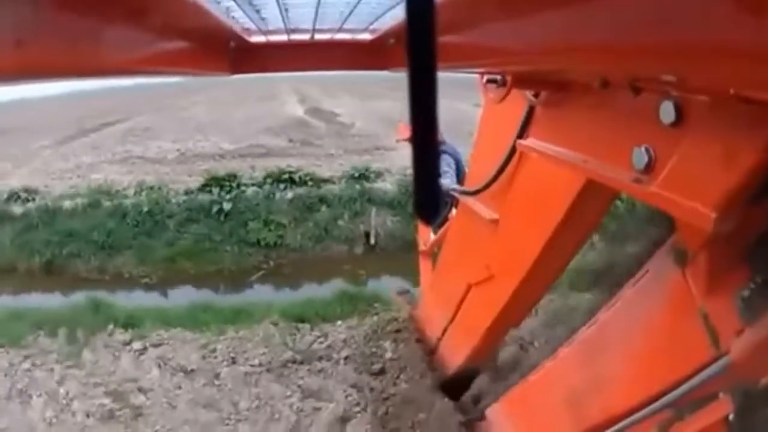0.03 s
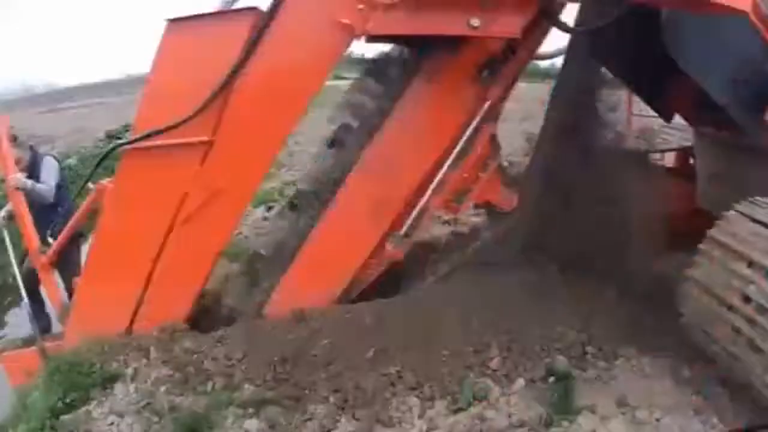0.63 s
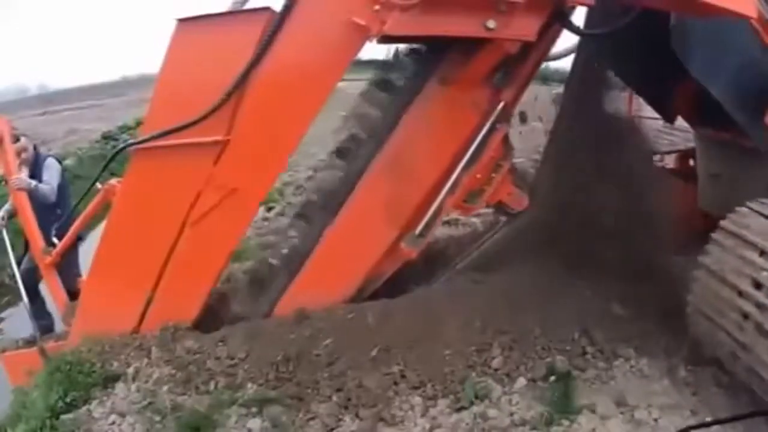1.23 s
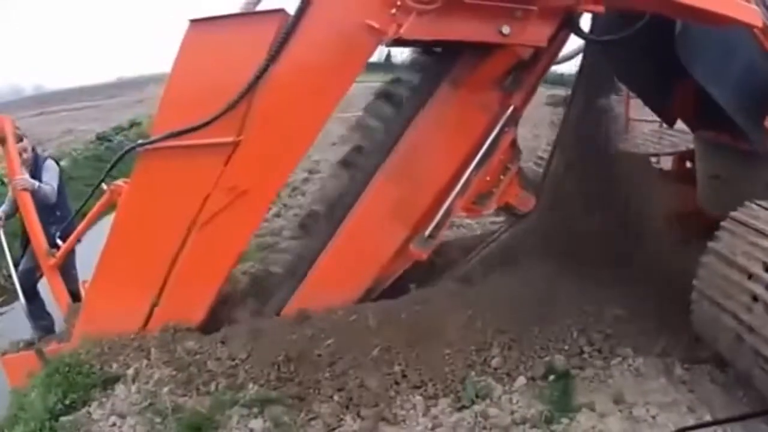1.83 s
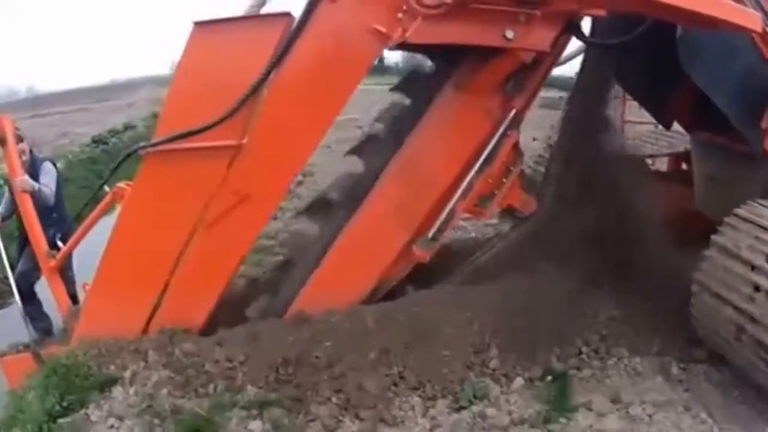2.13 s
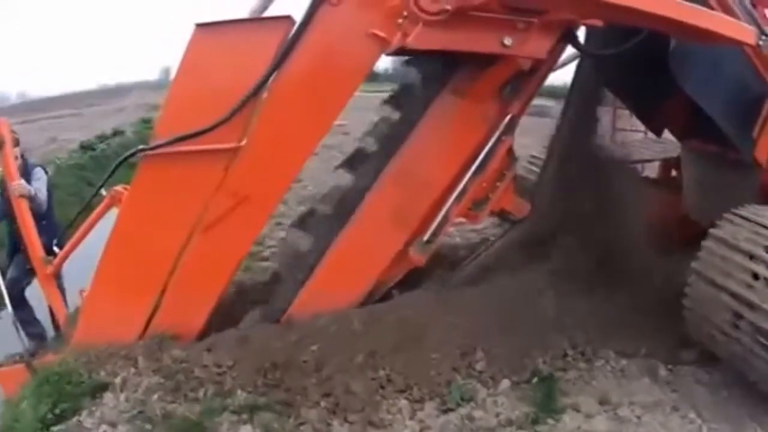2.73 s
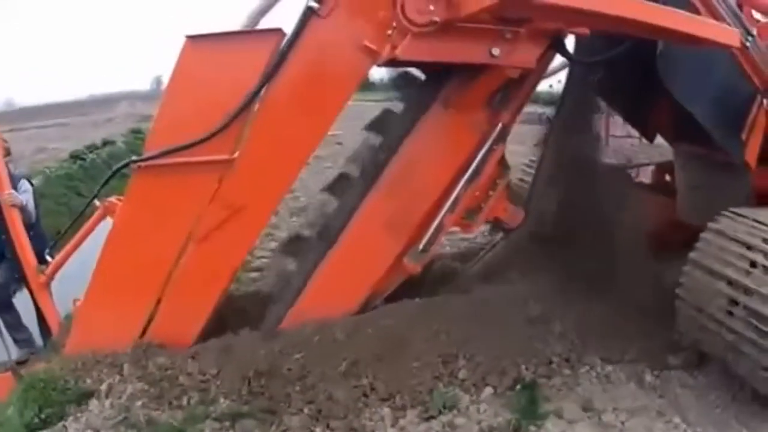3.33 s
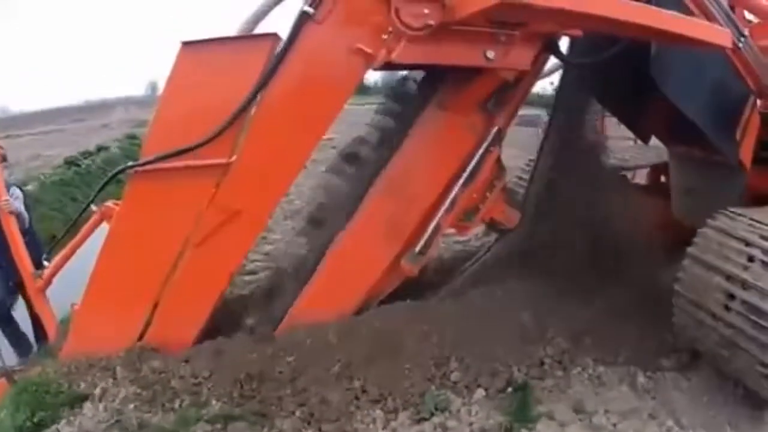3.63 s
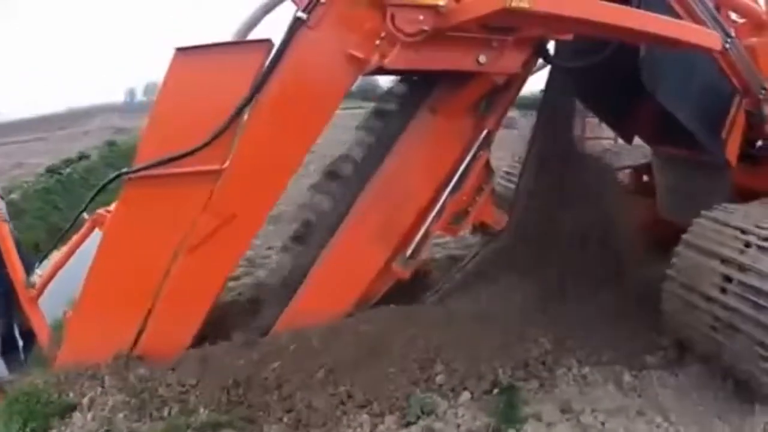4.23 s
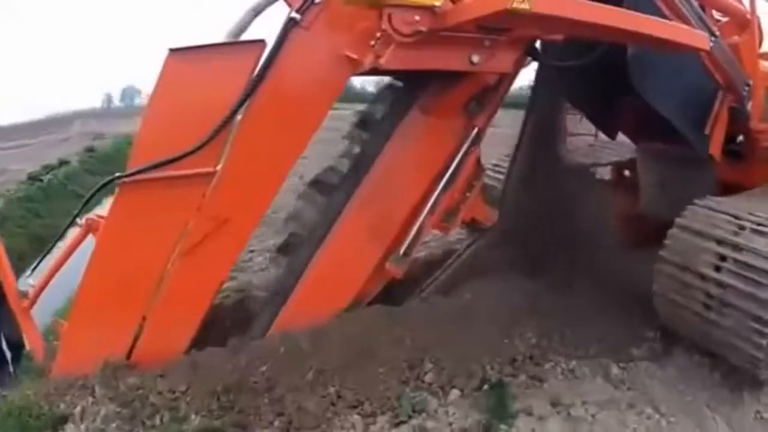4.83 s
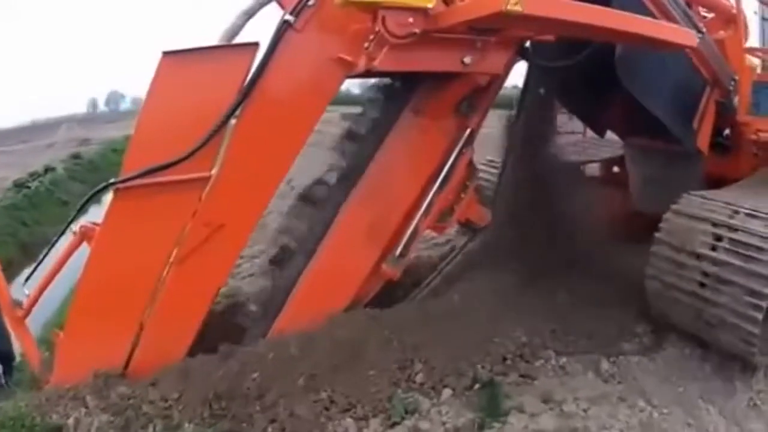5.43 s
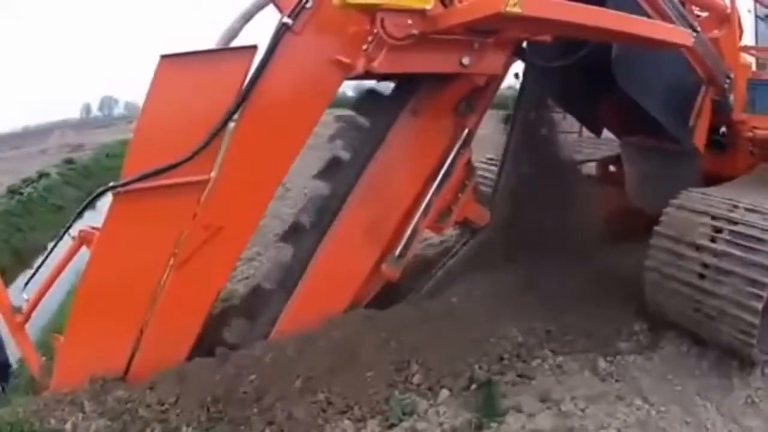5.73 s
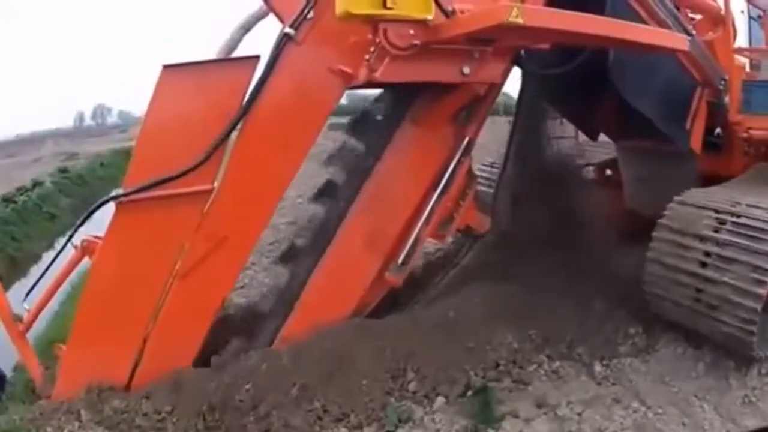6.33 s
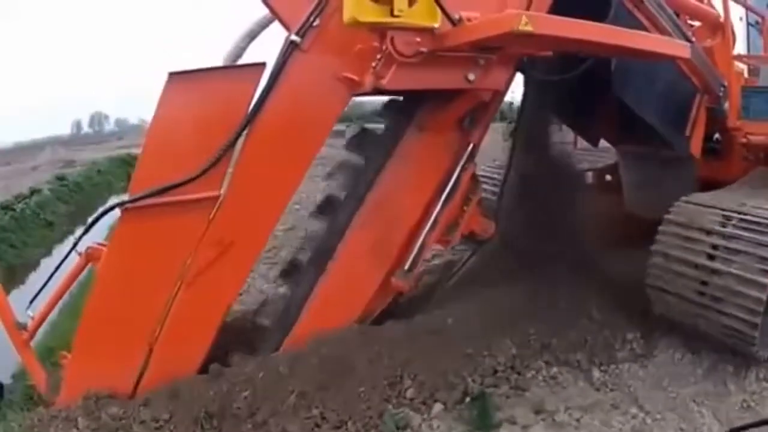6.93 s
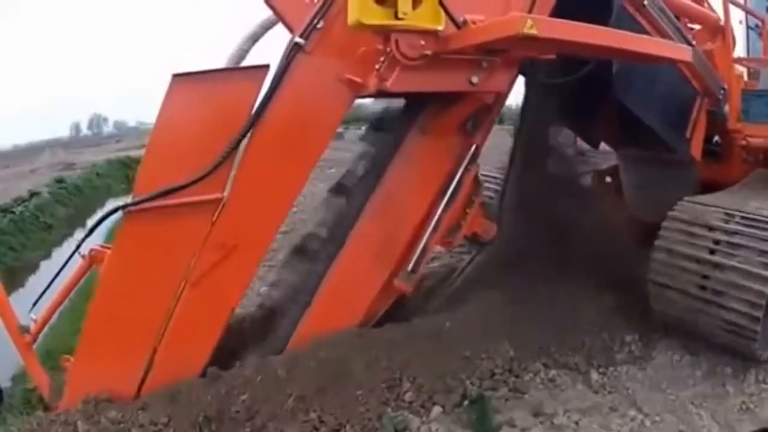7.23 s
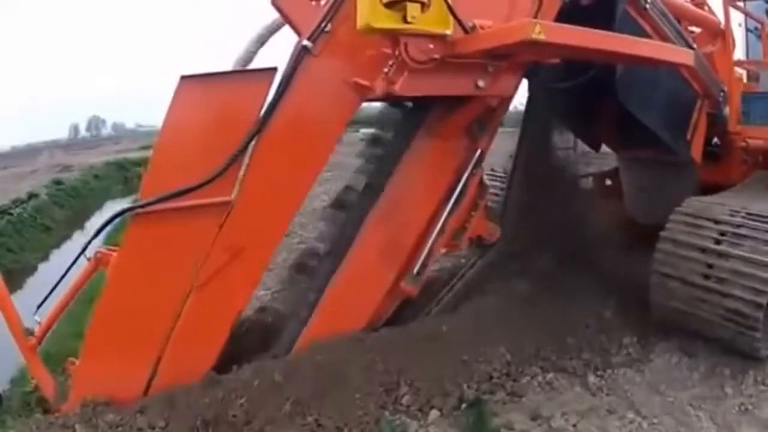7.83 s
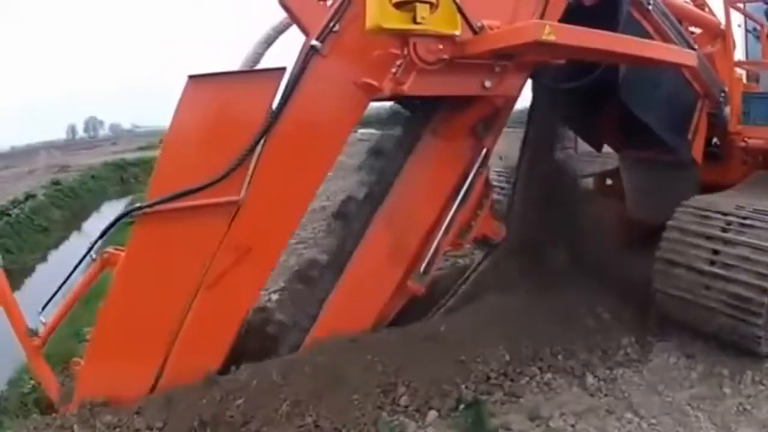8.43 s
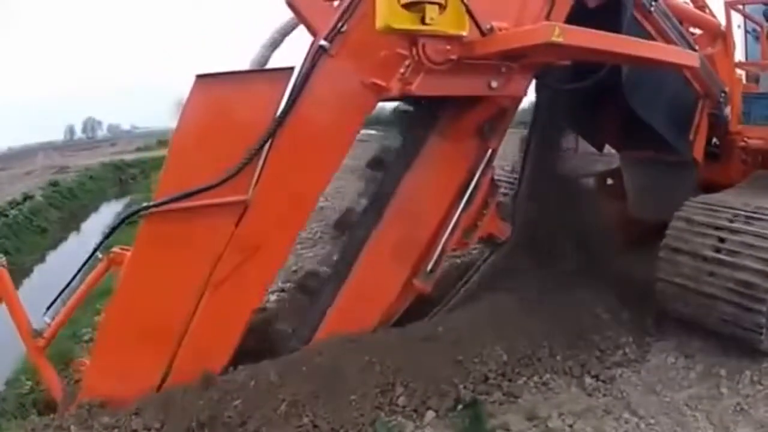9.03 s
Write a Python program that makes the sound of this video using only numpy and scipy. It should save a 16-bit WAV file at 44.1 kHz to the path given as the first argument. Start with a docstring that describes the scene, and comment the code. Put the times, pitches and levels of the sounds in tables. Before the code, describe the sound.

Loud steel rattling cuts to a quieter, fast rhythmic crunch of a chain trencher biting soil and stones over faint diesel hum.

```python
"""A tracked chain trencher cuts a trench in a field. We ride on it first: the steel frame booms,
rattles and squeals, and overloads the microphone. Then we stand on the ground beside the boom:
about 21 cutter teeth a second bite the soil, and the chain slaps the boom after each bite.
A brief squeak sounds and stones scrape and crack on the teeth, over diesel hum and a light breeze."""
import sys
import numpy as np
from scipy import signal
from scipy.fft import rfft, irfft, next_fast_len
from scipy.io import wavfile
from scipy.ndimage import uniform_filter1d, map_coordinates

SR = 44100
rng = np.random.default_rng(int(sys.argv[2]) if len(sys.argv) > 2 else 0)


def wav_record(signal):
    """Record a signal, one row per channel, as 16-bit PCM in the file named by sys.argv[1]."""
    frames = np.transpose(np.atleast_2d(signal))
    bounded = np.clip(frames, -1, 1)
    # unit amplitude maps onto the largest positive 16-bit level
    quanta = np.round(bounded * 32767).astype(np.int16)
    wavfile.write(sys.argv[1], SR, quanta)


N = 404397
TIME = np.arange(N) / SR

# Tone of crunching grit and pebbles. Each row: frequency in Hz, relative level in dB.
CRUNCH_SPECTRUM = [(500, -17.5), (1350, -14), (1750, -3.5), (2130, 1.5), (2750, -1.5), (3400, -10.5),
                   (4100, -16), (4900, -15.5), (7300, -17), (8100, -21), (9700, -11.5), (10900, -31),
                   (12800, -29.5), (14300, -18.5)]
# Resonances of the boom and its guards. Each row: pitch in Hz, width in Hz, relative level in dB.
BOOM_RESONANCES = [(153, 16.4, -7), (182.6, 15.4, 1), (220.6, 29.4, 2), (231.4, 12.6, 1), (253.4, 18, -3),
                   (321, 21, -6), (350.7, 34, -6.5), (396, 13, -3.5), (414.8, 11.6, -5)]


def from_db(db):
    """Decibels to gain."""
    return 10 ** (np.asarray(db) / 20)


def rms_one(x):
    """Scale to rms 1."""
    return x / np.sqrt(np.mean(x ** 2) + 1e-20)


def drift(rate_hz):
    """A smooth random wander of rms 1."""
    knots = rng.standard_normal(1000)
    coarse_s = TIME[::100]
    wander = map_coordinates(knots, [coarse_s * rate_hz * 2], order=3)
    return rms_one(np.interp(TIME, coarse_s, wander))


def coloured(x, spectrum):
    """Minimum-phase EQ through (Hz, dB) points, so nothing rings ahead of a click."""
    size = 2 * next_fast_len(N // 2 + 4096)
    hz = np.arange(size // 2 + 1) * SR / size
    points_hz, points_db = np.transpose(spectrum)
    gain = from_db(np.interp(np.log(hz + 1), np.log(points_hz), points_db))
    cepstrum = irfft(np.log(gain))
    cepstrum[1:size // 2] *= 2
    cepstrum[size // 2 + 1:] = 0
    return irfft(rfft(x, size) * np.exp(rfft(cepstrum)), size)[..., :N]


def resonate(x, modes):
    """Parallel resonances of alternating sign, each given as (Hz, width in Hz, dB)."""
    out = 0
    for k, (hz, width, level_db) in enumerate(modes):
        radius = np.exp(-np.pi * width / SR)
        poles = [1, -2 * radius * np.cos(2 * np.pi * hz / SR), radius ** 2]
        gain = (-1) ** k * from_db(level_db) * (1 - radius ** 2) / 2
        out = out + gain * signal.lfilter([1, 0, -1], poles, x + 1e-18)
    return out


def band(x, low_hz, high_hz):
    """Band-pass with steep edges."""
    return signal.sosfilt(signal.butter(4, [low_hz, high_hz], "band", fs=SR, output="sos"), x)


def tone(turns, order=1):
    """A sine of rms 1 that makes `order` cycles a turn."""
    return np.sqrt(2) * np.sin(2 * np.pi * order * turns)


def grains(per_s, spread_db=0):
    """Two unrelated streams of random clicks, varied in size by spread_db; rms 1."""
    sizes = from_db(spread_db * np.minimum(rng.exponential(1, (2, N)), 4))
    hits = rng.random((2, N)) < per_s / SR
    return rms_one(hits * sizes * rng.choice([-1, 1], (2, N)))


def stereo(pair, wider_db=0):
    """Two unrelated streams become mid and side of an image that is widest in the treble."""
    # Stereo width. Each row: frequency in Hz, side relative to mid in dB.
    width = [(200, -18), (1000, -21.5), (2200, -24), (4500, -13), (9000, -16)]
    side = from_db(wider_db) * coloured(pair[1], width)
    return np.array([pair[0] + side, pair[0] - side])


def chain_travel(teeth_per_s=20.87, speed_up_per_s2=0.04, first_bite_s=0.023):
    """Running count of teeth at every sample, as the chain slowly gathers speed."""
    return (teeth_per_s + speed_up_per_s2 * TIME / 2) * (TIME - first_bite_s) + 1


def bites(lag, uneven_db, floor, rise=0.11, fall=0.21):
    """Chain force: each tooth loads up and lets go with its own strength; times in tooth spacings."""
    travel = chain_travel() - lag
    tooth = np.round(travel).astype(int)
    since = travel - tooth
    strength = from_db(uneven_db * np.clip(rng.standard_normal(256), -2, 1.5))[tooth]
    pulse = np.exp(np.where(since < 0, since / rise, -since / fall))
    return rms_one(floor + strength * pulse)


def frame(jolt_s=0.0087):
    """The chain's shaking comes straight through the frame: deep booming, rattle and a thin squeal."""
    # Resonances of the frame. Each row: pitch in Hz, width in Hz, relative level in dB.
    frame_modes = [(61.3, 6.9, 6.5), (98.6, 9.3, 4), (115.4, 8.9, 1.5), (226, 8.3, -13.5), (287, 18, -9.5),
                   (347, 26.2, -1), (441.3, 23.6, -3), (886, 39, -18), (950, 20, -24.5), (1847, 46, -28)]
    # Jolts that shake the frame harder. Each row: time in seconds, boost in dB.
    jolts = [(0.043, 6), (.173, 0.5), (.365, 3), (.48, 3), (.58, 6)]
    # Tone of the rattle. Each row: frequency in Hz, relative level in dB.
    rattle_spectrum = [(20, 1.5), (170, 0), (500, -1), (800, -5), (1100, -10), (2100, -16), (2800, -14),
                       (4000, -24.5), (5200, -28), (7000, -32.5), (8800, -26), (12500, -28.5),
                       (15000, -34.5)]
    # Squealing steel. Each row: pitch in Hz, width in Hz, relative level in dB.
    squeal_modes = [(11570, 40, -5), (11648, 25, 0), (12350, 35, -1), (12435, 30, -3)]
    shaking = grains(per_s=6000)
    booming = np.roll(resonate(shaking[0], frame_modes), -SR)   # already ringing at the start
    booming /= np.sqrt(uniform_filter1d(booming ** 2, SR // 10) + 1e-12)   # the drive keeps effort even
    jolt_db = sum(db * np.exp(-((TIME - s) / jolt_s) ** 2) for s, db in jolts)
    force = bites(lag=0.2, uneven_db=11.5, floor=2.46) * from_db(jolt_db)
    clatter = coloured(grains(per_s=16000, spread_db=1.5) * force, rattle_spectrum)
    rattle = stereo(rms_one(clatter), wider_db=4)
    squeal = rms_one(resonate(shaking[1] * force, squeal_modes))
    return from_db(-4.5) * booming + from_db(-18) * rattle + from_db(-38) * squeal


def soil(load_db, patchy_db=1.14, dig_share=0.86):
    """Grit, pebbles and clods break under each tooth; between bites the spoil keeps pouring."""
    # How hard the teeth dig. Each row: time in seconds, crunch level in dB.
    digging = [(0.74, -46), (1.07, -47), (2.73, -43), (2.85, -50), (2.96, -45), (3.96, -43), (4.11, -51),
               (4.25, -42), (5.09, -45), (5.67, -41.5), (6.26, -45.5), (6.42, -39.5), (6.59, -46.5),
               (6.99, -41), (7.13, -45.5), (7.43, -39.5), (7.71, -46), (8.01, -40.5), (8.12, -44.5),
               (8.7, -44.9), (9.03, -41.5), (9.14, -43.5)]
    # Tone of thudding clods. Each row: frequency in Hz, relative level in dB.
    clod_spectrum = [(40, -7), (130, 1), (480, -4), (640, 5.5), (800, -2.5), (1120, 0), (1320, -13),
                     (2000, -18), (4000, -25.5)]
    dig_db = np.interp(TIME, *np.transpose(digging)) + patchy_db * drift(4)   # the soil is patchy
    grit_force = bites(lag=0.0043, uneven_db=7.5, floor=1.62)
    grit_clicks = grains(per_s=9000, spread_db=1.5) * grit_force * from_db(0.53 * drift(16))
    grit = rms_one(coloured(grit_clicks, CRUNCH_SPECTRUM))
    clod_force = bites(lag=0.07, uneven_db=6, floor=0.7)
    clods = rms_one(coloured(grains(per_s=2500, spread_db=3) * clod_force, clod_spectrum))
    clods_db = -4.5 + dig_share * dig_db + (1 - dig_share) * load_db
    crunch = from_db(dig_db) * (from_db(0.5) * grit + from_db(-3.5) * pebbles())
    return stereo(crunch + from_db(clods_db) * clods)


def pebbles(per_bite=3, uneven_db=3.5, scatter_teeth=0.33, decay_s=0.007, q=15):
    """Pebbles are hit around each bite: sudden rasps that ring the chain at pitches of their own."""
    travel = chain_travel()
    teeth = np.repeat(np.arange(1, int(travel[-1]) + 1), per_bite)
    places = teeth + scatter_teeth * rng.standard_normal(len(teeth)) - 0.08
    hits = (np.interp(places, travel, TIME) * SR).astype(int).clip(0, N - 1)
    force = from_db(uneven_db * rng.uniform(-2, 2, len(hits)))
    rasp = grains(per_s=14000)
    ringing = 0
    for hz in np.geomspace(900, 11000, 20):
        strikes = np.bincount(hits, force * rng.random(len(hits)) ** 5, N)   # a few pitches lead each hit
        envelope = signal.lfilter([1], [1, -np.exp(-1 / (decay_s * SR))], strikes + 1e-18)
        ringing = ringing + resonate(rasp * envelope, [(hz, hz / q, 0)])
    return rms_one(coloured(ringing, CRUNCH_SPECTRUM))


def boom(load_db, rumble_db=1.5):
    """The chain slaps the boom just after each bite and sets its plates ringing."""
    force = bites(lag=0.096, uneven_db=4.5, floor=0.88)
    slaps = grains(per_s=2800, spread_db=3.5)[0] * force
    ringing = band(resonate(slaps, BOOM_RESONANCES), 115, 454)
    ringing /= np.sqrt(uniform_filter1d(ringing ** 2, SR // 8) + 1e-12)   # the drive keeps effort even
    return from_db(load_db + rumble_db) * ringing


def engine(crank_hz=22.17, beat_s=2.44, dip_at_s=2.56, hum_full_s=7.4, hum_rise_db_per_s=18):
    """A six-cylinder diesel fires three times a turn; its higher hum comes up as we near it."""
    turns = np.cumsum(crank_hz * (1 + 0.00078 * drift(1.27))) / SR
    slip = (TIME - dip_at_s) / beat_s / 3   # a weaker tone beats slowly against the firing tone
    firing = from_db(-54.5) * tone(turns, order=3) - from_db(-62) * tone(turns + slip, order=3)
    hum_db = -53 - hum_rise_db_per_s * np.maximum(hum_full_s - TIME, 0) + 2.6 * drift(2.6)
    return firing + from_db(hum_db) * tone(turns, order=7)


def wind(breeze_db=-64):
    """A light breeze rumbles on the microphone and swells in gusts."""
    # Gusts. Each row: time of the peak in seconds, level in dB, half-length in seconds.
    gusts = [(2.253, -52, 0.3), (4.505, -51, 0.24)]
    swells = sum(from_db(db) * np.exp(-((TIME - s) / length) ** 2) for s, db, length in gusts)
    return (from_db(breeze_db) + swells) * rms_one(band(rng.standard_normal(N), 29, 99))


def squeak(start_s=1.2665, attack_s=0.002, length_s=0.023, level_db=-34.5):
    """A brief, wavering squeak of several high tones."""
    # Partials of the squeak. Each row: pitch in Hz, pitch wobble in Hz, relative level in dB.
    partials = [(1120, 35, -3), (1690, 40, -3), (2120, 28, 2), (2580, 56, 0), (3260, 35, -2),
                (3700, 91, -7)]
    age = np.maximum(TIME - start_s, 0)
    envelope = (1 - np.exp(-age / attack_s)) * np.exp(-(age / length_s) ** 4)
    tones = sum(from_db(db) * tone(np.cumsum(hz + wobble * drift(37)) / SR)
                for hz, wobble, db in partials)
    return from_db(level_db) * envelope * rms_one(tones)


def scrapes(ring_db=-5, boom_db=14):
    """A stone catches and judders along the steel; the contact spot rings and the boom answers."""
    # Dragged stones. Each row: start in seconds, level in dB, length in seconds, ringing pitch in Hz.
    drags = [(1.315, -35.5, .014, 1880), (1.365, -37.5, .014, 2100), (1.408, -32, .006, 3400),
             (2.319, -32, .06, 1050), (2.415, -38, .026, 2060), (2.967, -37, .03, 2280),
             (3.460, -35, .011, 2820), (4.034, -35.5, .021, 2130), (4.177, -38, .028, 2730),
             (4.601, -35, .019, 2070), (4.914, -35, .026, 2350), (5.222, -34.5, .015, 2100),
             (5.743, -33.5, .011, 1820), (5.886, -33.5, .02, 1880), (6.169, -35, .019, 1170),
             (6.310, -34, .022, 2150), (6.405, -31, .012, 2130), (8.037, -32, .012, 2520),
             (8.858, -35, .023, 2140), (9.081, -34, .035, 2240), (9.143, -29.5, .009, 2050)]
    # Tone of stone on steel. Each row: frequency in Hz, relative level in dB.
    stone_spectrum = [(70, -59), (500, -11.5), (1050, 1), (1400, -10), (2150, 8), (3500, -18), (5000, -13),
                      (8000, -16.5), (9800, -10), (12000, -34), (14300, -13)]
    rasp, ringing = np.zeros((2, N)), np.zeros(N)
    judder = rms_one(coloured(grains(per_s=5600, spread_db=-1), stone_spectrum))
    for start_s, level_db, length_s, hz in drags:
        start = int(start_s * SR)
        age = TIME[:min(SR // 4, N - start)]
        span = slice(start, start + len(age))
        pressure = from_db(level_db) * np.exp(-(age / length_s) ** 2)
        rasp[:, span] += pressure * judder[:, span]
        steel_modes = [(hz, hz / 20, 0), (hz * 1.7, hz / 10, -6)]
        ringing[span] += pressure * rms_one(resonate(rng.standard_normal(len(age)), steel_modes))
    boom_answer = resonate(rasp[0], BOOM_RESONANCES)
    return stereo(rasp) + from_db(ring_db) * ringing + from_db(boom_db) * boom_answer


def cracks(gap_cycles=1.5, decay_per_cycle=0.75, upper_ratio=1.85, upper_db=-4, side_db=-17):
    """A stone splits with two quick snaps, each gone within a few cycles."""
    # Splitting stones. Each row: start in seconds, peak of one snap in dB, pitch in Hz.
    splits = [(2.2136, -13.5, 1850), (2.3154, -10.5, 1050), (4.1965, -15, 740), (4.537, -20, 600),
              (7.259, -22.5, 4800)]
    out = np.zeros((2, N))
    age = TIME[:SR // 20]
    for start_s, peak_db, hz in splits:
        phase = 2 * np.pi * hz * age
        tones = np.sin(phase) + from_db(upper_db) * np.sin(phase * upper_ratio)
        snap = np.exp(-age * hz * decay_per_cycle) * tones
        snap += 0.2 * np.exp(-age / 0.00026) * rng.standard_normal(len(age))   # bright tick on the attack
        snap = snap * (1 + from_db(side_db) * rng.standard_normal((2, len(age))))
        snap *= from_db(peak_db) / np.abs(snap).max()
        for snap_s, sign in ((start_s, 1), (start_s + gap_cycles / hz, -1)):
            start = int(snap_s * SR)
            out[:, start:start + len(age)] += sign * snap
    return out


def scene(cut_s=0.6902, crossfade_s=0.0057):
    """On the frame first, then a quick cut to the ground beside the boom."""
    # Load on the boom. Each row: time in seconds, rumble level in dB.
    load = [(0.75, -41.5), (1.15, -43), (1.4, -39.5), (2.41, -40.5), (2.83, -43), (4.61, -39),
            (4.82, -40.5), (9.15, -43)]
    load_db = np.interp(TIME, *np.transpose(load))
    beside = soil(load_db) + boom(load_db) + engine() + scrapes() + squeak() + cracks() + wind()
    aboard = np.clip((cut_s - TIME) / crossfade_s + 0.5, 0, 1)
    return aboard * frame() + (1 - aboard) * beside


def record(dry, ceiling=0.95, notch_hz=6050, notch_q=4.4, cutoff_hz=15200):
    """The microphone overloads softly, has a notch in its treble and loses the very top."""
    clipped = dry / (1 + (dry / ceiling) ** 6) ** (1 / 6)
    notch = signal.iirnotch(notch_hz, notch_q, fs=SR)
    notched = signal.lfilter(*notch, signal.lfilter(*notch, clipped))
    return signal.sosfilt(signal.ellip(10, 0.1, 90, cutoff_hz, fs=SR, output="sos"), notched)


dry = scene()
out = record(dry)
wav_record(out)
```